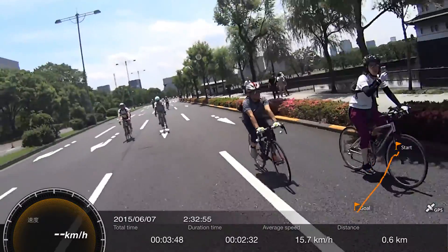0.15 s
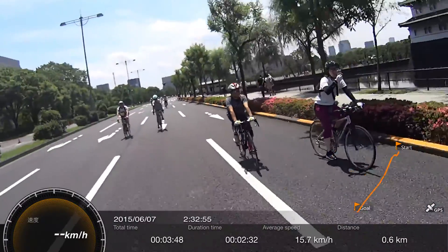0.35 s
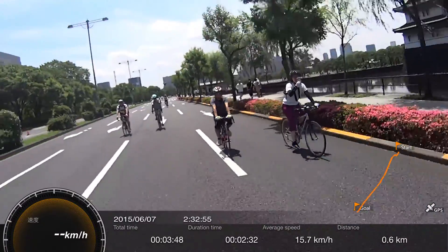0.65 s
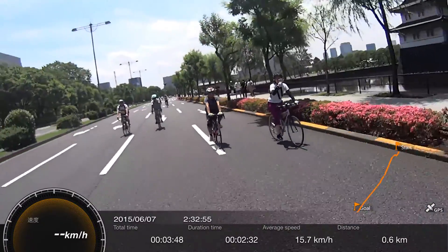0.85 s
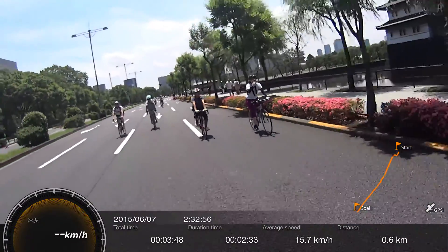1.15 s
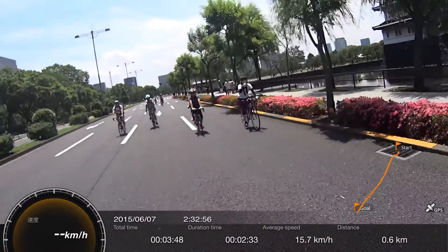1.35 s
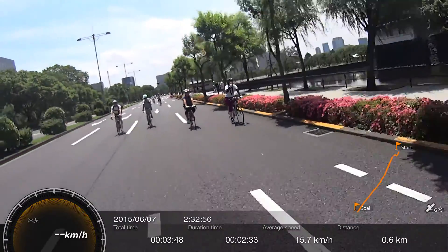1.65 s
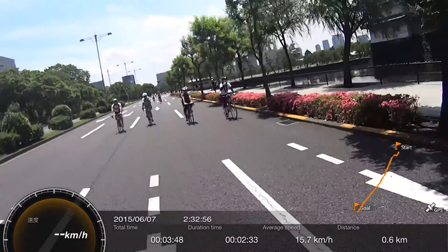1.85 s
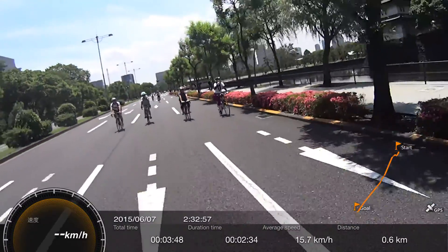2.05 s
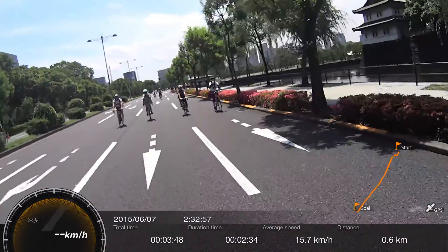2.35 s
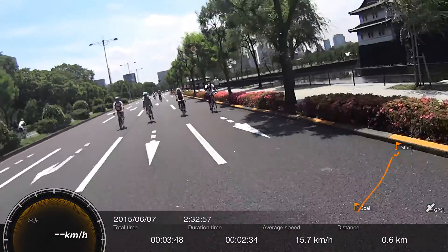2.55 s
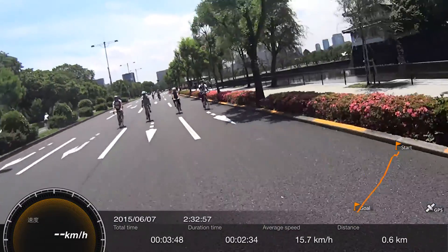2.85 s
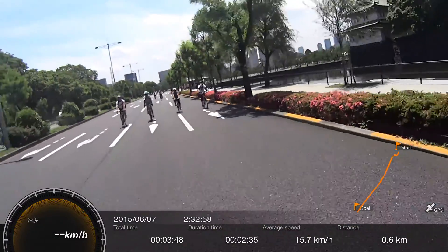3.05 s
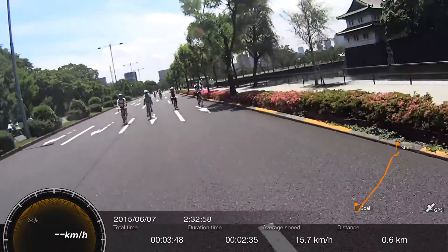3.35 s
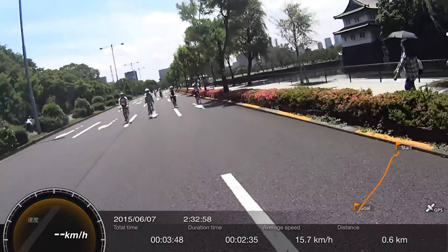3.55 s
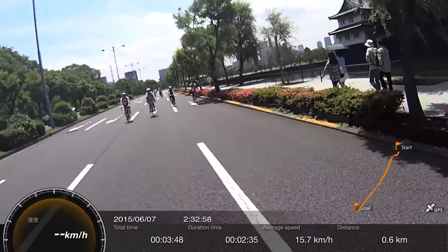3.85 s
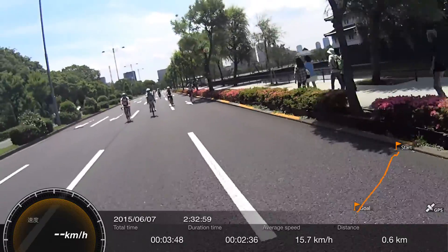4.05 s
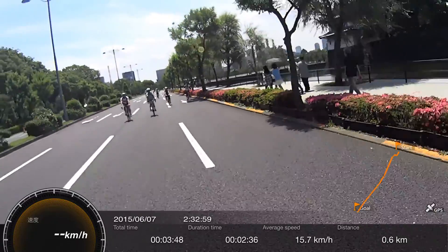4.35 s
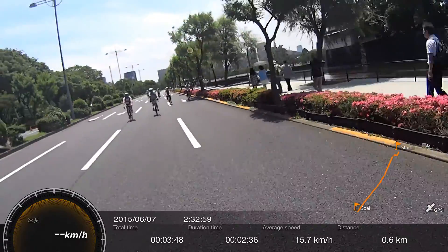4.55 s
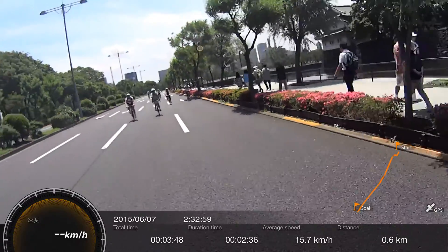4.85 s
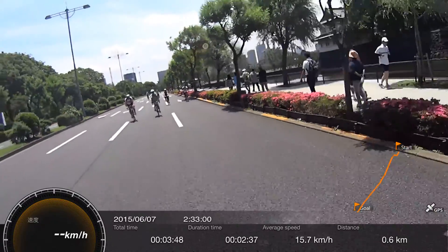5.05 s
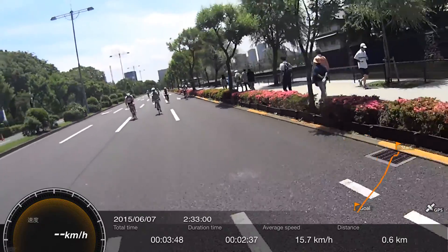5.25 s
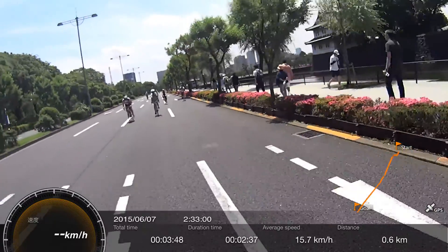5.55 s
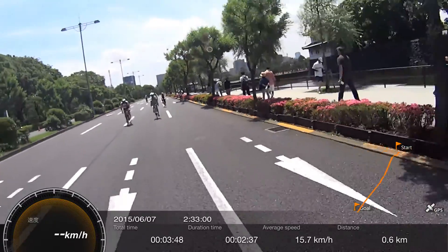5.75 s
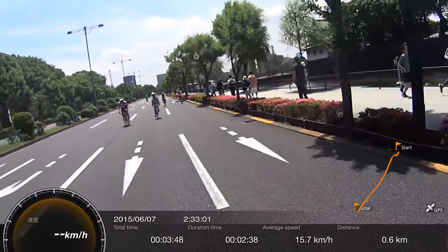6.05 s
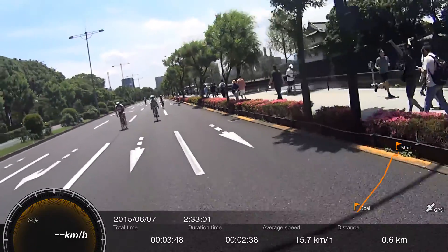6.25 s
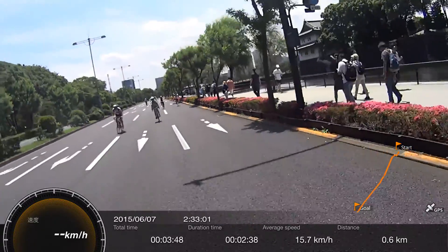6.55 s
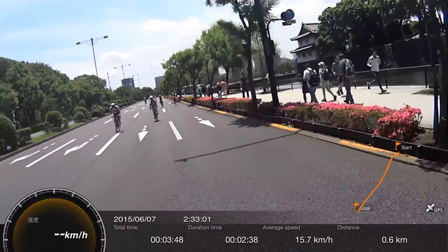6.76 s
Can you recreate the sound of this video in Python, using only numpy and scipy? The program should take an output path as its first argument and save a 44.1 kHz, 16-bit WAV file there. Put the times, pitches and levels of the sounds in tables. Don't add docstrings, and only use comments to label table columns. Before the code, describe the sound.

Outdoors on a paved road, a small camera clamped to a rolling bicycle hears it mainly through the frame. A dull knock and heavy, soft jolt land at once, over steady tyre whirr ringing near 2 kHz, low lumpy wind and faint hiss. Strong short clunks follow around 0.2, 0.8, 1.4, 1.9, 2.5 and 3.1 seconds, among lighter knocks, tiny ticks, chain pings and surging gritty grind. Sharp metal clicks stand out at 2.4, 3.2 and 3.5. A longer jolt with a knock comes at 3.6, then a very brief stuttering scrape at 3.8. From 4 to 5.9 the rattle thins to lighter knocks, ticks and short grinding bursts. Heavy clunks return at 6.0 and 6.6, with a bright click at 6.1. A small spit of grit at 6.8 leads into last knocks and a faint jolt, the whirr continuing to the end near 6.9.

```python
import sys
import numpy as np
from scipy import signal
from scipy.fft import rfft, irfft, next_fast_len
from scipy.io import wavfile

SR = 44100
rng = np.random.default_rng(int(sys.argv[2]) if len(sys.argv) > 2 else 0)


def transcribe(u):
    v = np.clip(np.atleast_2d(u).T, -1, 1)
    q = np.round(v * 32767).astype(np.int16)
    wavfile.write(sys.argv[1], SR, q)


def decibels_to_gain(level_db):
    exponent = np.asarray(level_db, float) / 20
    return 10 ** exponent


N = 305172


def evened(x):
    return x / np.sqrt(np.mean(x ** 2) + 1e-20)


def read(points, hz):
    f, value = np.transpose(points)
    return np.interp(np.log(hz + 1), np.log(f + 1), value)


def gain_over_time(points):
    s, db = np.transpose(points)
    return decibels_to_gain(np.interp(np.arange(N) / SR, s, db))


def add(mix, s, sound):
    part = mix[:, round(s * SR):][:, :sound.shape[-1]]
    part += sound[..., :part.shape[1]]


def coloured(x, points):
    size = next_fast_len(N)
    gain = decibels_to_gain(read(points, np.fft.rfftfreq(size, 1 / SR)))
    return irfft(rfft(x, size) * gain, size)[..., :N]


def pair(same):
    a, b = rng.standard_normal((2, N))
    return np.array([a, same * a + np.sqrt(1 - same ** 2) * b])


def flutter(hz, depth_db):
    step = 32
    low_pass = signal.butter(2, hz, fs=SR / step)
    slow = signal.lfilter(*low_pass, rng.standard_normal(N // step + 2))
    gain = decibels_to_gain(depth_db * np.clip(evened(slow), -3, 1.5))
    return np.interp(np.arange(N) / step, np.arange(len(slow)), gain)


def ring(hz, t60, db, lag=0, rise_cycles=0.38, size=3600):
    t = np.arange(size) / SR
    hz, t60, db, lag = (np.reshape(v, (-1, 1)) for v in (hz, t60, db, lag))
    build_up = 1 - np.exp(-t * hz / rise_cycles)
    return decibels_to_gain(db - 60 * t / t60) * np.sin(2 * np.pi * hz * t - lag) * build_up


# (time [s], level [dB])
WIND_LEVEL = [(0.0, -46), (0.06, -46), (0.44, -47), (1.23, -45), (1.66, -50.5), (2.2, -47.5), (2.35, -46),
              (3.6, -46.5), (3.81, -46), (4.05, -51), (4.28, -52), (4.76, -47.5), (4.93, -48),
              (5.07, -51.5), (6.65, -46), (6.92, -43)]
# (frequency [Hz], level [dB per Hz])
WIND_COLOUR = [(15, -13), (40, -3), (90, -4), (160, -12.5), (300, -9), (800, -107), (3000, -66)]


def wind():
    buffet = evened(coloured(pair(0.95), WIND_COLOUR))
    return decibels_to_gain(5.5) * gain_over_time(WIND_LEVEL) * buffet * flutter(11.8, 2.6)


# (frequency [Hz], level [dB per Hz])
HISS_COLOUR = [(180, -46), (300, -37), (474, 0), (552, 0), (761, -4), (1400, -3.5), (2080, 1),
               (2910, -31.5), (10500, -42), (11500, -50), (15000, -73), (22000, -120)]


def hiss():
    return decibels_to_gain(-43) * evened(coloured(pair(0.46), HISS_COLOUR)) * flutter(48, 0.38)


# (frequency [Hz], level [dB per Hz])
FIZZ_COLOUR = [(3000, -38), (5500, 9), (6500, -4), (11000, -5)]


def fizz():
    rasp = load()[2]
    noise = evened(coloured(pair(0.02), FIZZ_COLOUR) * rasp ** 0.64 * flutter(22, 0.91))
    since = np.arange(N) / SR - 6.787
    grit = (since > 0) * decibels_to_gain(-41 - 10 * abs(since) / 0.035)
    return (decibels_to_gain(-57) + grit) * noise


# (time [s], level [dB])
WHIRR_LEVEL = [(0.0, -39.5), (0.23, -42), (1.44, -39.5), (4.2, -41.5), (4.47, -43), (5.82, -41),
               (6.59, -41), (6.92, -41)]
# (frequency [Hz], width [Hz], level [dB])
HOUSING = [
    (2020, 330, 7),
    (2094, 57, 2.5),
    (2266, 160, 4),
    (2530, 350, -11.5),
]


def tyres():
    noise, whirr = pair(0.5), 0
    for hz, width, db in HOUSING:
        r = np.exp(-np.pi * width / SR)
        resonance = [1, -2 * r * np.cos(2 * np.pi * hz / SR), r * r]
        tone = evened(signal.lfilter([1, 0, -1], resonance, noise))
        whirr = whirr + decibels_to_gain(db) * flutter(8.5, 2.0) * tone
    return decibels_to_gain(1.0) * gain_over_time(WHIRR_LEVEL) * flutter(22, 1.64) * evened(whirr)


# (peak time [s], time to swell by 10 dB [s], grind level [dB],
# low shake level against the grind [dB], rasp level against the grind [dB])
SURGES = [(0.011, 0.038, -36.5, -5, 0.5), (0.137, 0.056, -28, -0.5, -6.5), (0.305, 0.071, -33, -2, -9),
          (0.5, 0.13, -37.5, 0, -2.5), (0.58, 0.078, -33, -1, -7.5), (0.72, 0.058, -27.5, -2, -8),
          (0.9, 0.052, -32.5, 0.5, -13), (1.095, 0.028, -36.5, 7.5, 2), (1.165, 0.049, -30.5, -18.5, -9),
          (1.295, 0.084, -30.5, -3, -5), (1.48, 0.031, -31.5, -16, -24), (1.66, 0.05, -33, 2.5, -2),
          (1.825, 0.057, -32, -4, -8.5), (2.03, 0.044, -32.5, 4.5, -25), (2.235, 0.081, -33, 1, -5.5),
          (2.47, 0.22, -33, -7, -5.5), (2.62, 0.057, -30, -13, -25), (2.803, 0.032, -30.5, 3.5, -5.5),
          (2.981, 0.038, -28, -7, -8), (3.326, 0.12, -30.5, -2.5, -7.5), (3.533, 0.065, -34.5, -1, -6.5),
          (3.97, 0.044, -40, 0, -11), (4.414, 0.021, -32.5, -11, -11), (4.52, 0.082, -40.5, 1.5, -10),
          (4.791, 0.014, -29.5, -3, -21), (5.27, 0.019, -32, -22, -10), (5.49, 0.085, -33, -10, -6.5),
          (5.63, 0.11, -34, -0.5, -8), (5.784, 0.043, -36.5, -9, -5), (5.925, 0.1, -32, -4, -8.5),
          (6.07, 0.1, -34, 4.5, -12), (6.285, 0.17, -36, -7, -5), (6.48, 0.078, -35.5, -4, -6.5),
          (6.685, 0.087, -30, -2, -8), (6.875, 0.068, -33, 6, -2.5)]


def load():
    t = np.arange(0, N / SR + .01, .002)
    power = decibels_to_gain(np.array([[-49], [-61], [-49]])) ** 2
    for s, swell, db, low_db, rasp_db in SURGES:
        drop_db = 10 * np.maximum(s - t, (t - s) / 0.86) / swell
        power = power + decibels_to_gain(db + np.array([[low_db], [0], [rasp_db]]) - drop_db) ** 2
    windup_s, rattle_s = 0.038, 0.093
    for s, db, *_ in CLUNKS:
        drop_db = 10 * np.maximum((s - t) / windup_s, (t - s) / rattle_s)
        shaken_db = np.array([[-27.5], [-26], [-33.5]]) + 0.57 * db
        power = power + decibels_to_gain(shaken_db - drop_db) ** 2
    return [np.interp(np.arange(N) / SR, t, gain) for gain in np.sqrt(power)]


# (frequency [Hz], time to fall 60 dB [s], left level [dB], right level [dB], # lead of
MOUNT_LOW = [(156, 0.049, -17, -17, 0, -1), (243, 0.045, -20, -25, 0.45, -1), (288, 0.032, -13.5, -13, 0.5, -1),
             (347, 0.011, 0, 4, 0.06, 1), (465, 0.031, -15.5, -5, 4, -1), (596, 0.04, -15, -26.5, 0, 1),
             (646.5, 0.045, -16, -15.5, -0.1, -1), (769, 0.061, -22.5, -24, -0.3, 1),
             (911, 0.049, -20.5, -34, -1.5, -1), (998.4, 0.03, -15, -14, 0.25, -1),
             (1140, 0.023, -16.5, -15, -1.53, -1)]
# (frequency [Hz], time to fall 60 dB [s], left level [dB], #
# right level [dB], lead of the left capsule [rad], first motion [+-1])
MOUNT_HIGH = [(1330, .011, -10, -12, .1, -1), (1534, .037, -19, -19, .7, -1), (1677, .029, -25, -26, -.1, 1),
              (2132, .008, -11, -11, -.6, -1), (2174, .015, -15, -18, -.7, 1), (2499, 0.0082, -20, -20, .5, 1),
              (2790, 0.017, -26, -23, .8, -1), (3200, 0.023, -27, -24.5, -0.5, 1),
              (3430, 0.014, -27, -23, -.2, -1), (4010, 0.0072, -22, -24, 0.92, 1),
              (4660, 0.0072, -27, -25, -0.7, -1), (5095, 0.013, -24, -23, 1, 1),
              (5370, 0.0066, -28, -22, 0.8, -1)]
MOUNT = MOUNT_LOW + MOUNT_HIGH


def mount(colour_db, detune=1):
    hz, t60, left_db, right_db, lead, motion = np.transpose(MOUNT)
    left = ring(hz * detune, t60, left_db + colour_db, -lead)
    right = ring(hz * detune, t60, right_db + colour_db)
    return np.sign(motion) @ np.array([left, right])


# (frequency [Hz], level [dB])
GRIND_COLOUR = [(100, -15.5), (280, -6.5), (460, -15), (620, 4), (1000, 8.5), (1600, 13), (2200, 9.5),
                (2800, 3.5), (3400, -0.5), (4000, 0.5), (4600, 1), (5200, -6)]


def drive_train():
    hz, out = np.transpose(MOUNT)[0], 0
    groups, points = np.digitize(hz, [550, 2500]), 5
    group_db, impacts_per_s = (-1.5, -1.2, 1.8), (360, 600, 480)
    for k, (level, db, per_s) in enumerate(zip(load(), group_db, impacts_per_s)):
        impacts = 1. * (rng.random((points, N)) < per_s / SR)
        count = np.count_nonzero(impacts)
        impacts[impacts > 0] = decibels_to_gain(2.63 * np.minimum(rng.exponential(1, count), 4.2))
        impacts *= level * flutter(16.4, 2.8) * rng.choice([-1, 1], (points, N))
        for x, path in zip(impacts, rng.standard_normal((points, 2, len(MOUNT)))):
            feed_db = 2 * path[0] - 60 * (groups != k)
            body = mount(read(GRIND_COLOUR, hz) + feed_db, 1 + .03 * path[1])
            body = body / np.linalg.norm(body)
            grind = signal.oaconvolve(x[None], body, axes=1)[:, :N]
            out = out + decibels_to_gain(db + 7.0) * flutter(9.8, 2.87) * grind
    return out


# (time [s], peak level [dB], pitch [Hz])
PINGS = [(0.0352, -20.5, 1600), (0.1063, -27, 1650), (0.3052, -26, 1450), (0.4713, -32, 2090),
         (0.5796, -20.5, 1580), (1.141, -37, 1650), (1.2474, -21.5, 1590), (1.8063, -28, 2300),
         (1.9288, -17, 1520), (2.2049, -28, 2190), (2.4528, -20.5, 2450), (2.5027, -24, 1600),
         (2.935, -35, 1660), (3.4401, -25, 2000), (3.4725, -30, 2120), (3.5694, -27, 2070),
         (3.6282, -17, 1260), (3.685, -20, 2570), (4.2652, -30, 2150), (4.4103, -27, 1590),
         (4.4174, -35, 2000), (4.8948, -29, 2240), (4.9342, -29, 2060), (5.0764, -24.5, 2170),
         (5.5578, -30, 2320), (6.0791, -28, 1640), (6.7436, -36, 1490)]


def pings():
    out = np.zeros((2, N))
    for s, db, f in PINGS:
        add(out, s, ring([f, f], [0.023] * 2, [db - 4.0, db + 3.5], [0, .4], 0.73, size=1200))
    return out


# (middle time [s], peak level [dB], pitch [Hz],
# left minus right level [dB], half length [ms])
SLIPS = [(3.8305, -22, 2300, 0, .6), (3.8322, -13, 1900, -5, .5), (3.8343, -12, 2550, -6, .9),
         (3.8358, -14, 2720, 12, .9), (3.8367, -6, 2450, -10, .6), (3.8381, -12, 2000, 6, .5),
         (3.8397, -16, 2250, -5, .6), (3.8421, -13, 1950, 5, .9), (3.8449, -8, 2200, 5, .7),
         (3.8466, -20, 2100, 0, .6), (3.849, -17, 2050, 3, .6), (3.833, -22, 900, 4, .8),
         (3.8372, -17, 1450, -4, .6), (3.842, -21, 1200, 0, .7), (3.8448, -25, 3400, 6, .4)]


def scrape():
    out, t = np.zeros((2, N)), np.arange(400) / SR
    for s, db, f, pan_db, half_ms in SLIPS:
        u = t - t[200]
        slip = np.cos(2 * np.pi * f * u - np.array([[2.2], [0]])) / np.cosh(u * 1300 / half_ms)
        add(out, s - t[200], decibels_to_gain([[db + pan_db / 2], [db - pan_db / 2]]) * slip)
        add(out, s - t[100], decibels_to_gain(db - 28.0) * rng.standard_normal((2, 200)) * np.hanning(200))
    return out


# (time [s], peak level [dB], low ring under it [dB], upper ring under it [dB])
TICKS = [(0.1376, -22, -9, -24), (0.194, -27, 1, -20), (0.6797, -32, -1, -7), (0.717, -21, -5.5, -28),
         (1.19, -38, 18, -18), (1.447, -29, 1, -12), (1.978, -23, -7, -18), (2.231, -20.5, -8, -26),
         (2.7936, -23, -4, -24), (2.816, -25, -10, -23), (3.0404, -25, -12, -16), (3.333, -24.5, 1.5, -24),
         (3.526, -40, -7, -15), (4.166, -42.5, 12, -16), (4.248, -30, -5, -16), (4.4792, -44, -18, -14),
         (4.598, -31, -6, -17), (4.782, -40, 14, -20), (4.8404, -29, -11, -17), (4.9696, -37.5, 11, -11),
         (5.3457, -34, -13, -18), (5.633, -40, -5, -19), (5.911, -26, -8, -22), (6.0603, -27.5, -14, -7.5),
         (6.679, -22.5, -3, -15), (0.1096, -27, -2, -25), (0.4958, -25, -6, -24), (0.5377, -39, -10, -20),
         (0.7038, -24, -6, -23), (0.7871, -27, -2, -20), (1.1004, -25, -8, -23), (2.506, -20, -3, -20),
         (2.7821, -26, -3, -20), (3.6188, -24, -5, -22), (6.858, -28, -5, -18)]
# (time [s], peak level [dB], low ring under it [dB],
# upper ring under it [dB], extra treble [dB])
CLICKS = [(0.5112, -23, -16, -16, 3), (1.0874, -22, -8, -25, 0), (1.6277, -37, 0, -6, -5),
          (1.6685, -15, -26, -22, 3), (2.4277, -9.5, -12.5, -27, 5), (3.0595, -22, -8, -23, 2),
          (3.1951, -9, -13, -15, -8), (3.543, -7, -17, -17, 0.5), (5.4755, -28, -19, -10, 0),
          (5.529, -45, 5, 1, 13), (6.1051, -5, -20, -18.5, -2.5), (6.4026, -22.5, -25, -25, 0),
          (6.537, -17.5, -18, -16, -3), (6.7878, -17, -24, -17, 8.5)]
# (frequency [Hz], time to fall 60 dB [s], level [dB])
TICK_MODES = [(1515, 0.022, -1.5), (2120, 0.019, 3), (2856, 0.013, -7), (3260, 0.012, -2.5),
              (3800, 0.0056, -12.5), (4450, 0.013, 3.5), (4820, 0.014, 3), (5220, 0.0075, 4.5),
              (6630, 0.009, 6), (8500, 0.0066, -5), (10000, 0.0064, -0.5)]
TICK_RING = [1, 1, 0, 0, 0, 2, 2, 2, 3, 3, 3]


def ticks():
    out, (hz, t60, mode_db) = np.zeros((2, N)), np.transpose(TICK_MODES)
    t, contact_s = np.arange(1200) / SR, 0.00129
    press = np.exp(-(np.minimum(t - contact_s, 0) / (.5 * contact_s)) ** 2)
    hold = decibels_to_gain(60 * np.minimum(t, contact_s) / t60[:, None])
    for s, db, low, upper, *bright in sorted(CLICKS + TICKS):
        start, tune, side = rng.standard_normal((3, len(hz)))
        treble = upper - 9.5 + sum(bright)
        level_db = db - 6.0 + mode_db + np.array([0, low, upper, treble])[TICK_RING]
        for capsule, spread in enumerate((0, .35)):
            lag = 0.35 * np.tanh(start) + spread * side
            modes = ring(hz * (1 + 0.021 * tune), t60, level_db + 4.7 * capsule, lag, size=1200)
            add(out[capsule:capsule + 1], s - .0005, (press * hold * modes).sum(0))
    return out


# (time [s], peak level [dB], frequency [Hz], time to fall 60 dB [s])
JOLTS = [
    (0.0354, 0, 107.4, 0.037),
    (3.632, -16.5, 214, 0.13),
    (6.145, -27, 108, 0.076),
    (6.865, -28, 110, 0.038),
]


def jolts():
    out = np.zeros((2, N))
    for s, db, f, t60 in JOLTS:
        add(out, s, ring([f, f], [t60, t60], [db, db], [.8, -.8]))
    return out


# (time [s], blow level [dB], thump under the blow [dB],
# ring under the blow [dB], hardness under the blow [dB])
CLUNKS = [(0.209, -5.5, -6.5, -12.5, -15), (0.418, -26, 1, 3.5, -5), (0.8, -3.5, -18, -16, -20.5),
          (0.992, -12.5, -11, -14, -19), (1.365, -5, -12, -13, -16), (1.562, -25.5, -1, 0.5, -13),
          (1.9378, -9.5, -9, -7.5, -13), (2.5146, -6, -14, -10.5, -14), (2.8491, -10, -16, -15.5, -24),
          (3.0817, -4.5, -14.5, -16, -15.5), (3.631, -10.5, -9.5, -5, -15),
          (5.9779, -6.5, -14, -11.5, -15.5), (6.185, -21.5, 1.5, 1, -4), (6.5694, -6.5, -14.5, -9.5, -20.5),
          (6.769, -15, -4, -2.5, -6)]
# (time [s], blow level [dB], thump under the blow [dB],
# ring under the blow [dB], hardness under the blow [dB])
KNOCKS = [(0.034, -13, -11.5, -19.5, -31), (1.149, -17.5, -6.5, -7.5, -26), (1.628, -29, -6, -7, -16),
          (1.7089, -13, -19, -23, -26), (2.1135, -18, -19, -19, -18), (2.274, -18, -14, -16, -30),
          (2.496, -32, 2, -2, -13), (2.506, -25, -14, 2, -16), (3.053, -30.5, -10, -1, 0),
          (3.278, -29, -5, 0, -18), (3.362, -24, -33, -9, -15), (3.704, -27.5, -5, -13, -12),
          (4.124, -17, -23.5, -18, -25), (4.279, -14, -17.5, -17, -21), (4.851, -18, -11.5, -18, -17),
          (5.125, -19.5, -25, -30, -28), (5.237, -36.5, -2, -11, -16), (5.377, -34, 4, -3.5, -2),
          (5.475, -31.5, -19, -8, 4), (5.599, -26.5, 0.5, 1, -22), (5.621, -28, -18, -3, -0.5),
          (5.634, -26, -10, -2, -17), (6.861, -29.5, -13, -18, -5), (0.28, -32, -2, -22, -20),
          (0.871, -31, -6, -18, -20), (1.073, -28, -4, -16, -15), (2.421, -26, -13, -18, -12),
          (2.574, -23.5, -3.5, -21, -36), (2.686, -29, -10, -7, -25), (2.763, -25, -13, -22, -15),
          (3.037, -32, -12, -10, -7), (3.143, -29, -5, -6, -24), (3.528, -28, -11, -6, -20),
          (5.416, -29, -22, -12, -5), (5.44, -28.5, -16, -13, -24), (5.58, -38, -10, -10, -20),
          (5.754, -32, -21, -23, -15), (6.268, -33, -15, -6, -20), (6.47, -30, -24, -7, -24),
          (6.823, -24, -5, -26, -24)]
# (frequency [Hz], level under the blow [dB])
USUAL_KNOCK = [(170, -15.5), (420, 1.5), (750, -11), (1500, -12), (2800, -23), (4000, -29), (5100, -11)]


def knocks():
    out, hz = np.zeros((2, N)), np.transpose(MOUNT)[0]
    for s, db, thump, body, hard in sorted(CLUNKS + KNOCKS):
        level, tune = rng.standard_normal((2, len(MOUNT)))
        crack = hard - 13
        wanted = (thump, 0, body, hard, crack, crack, crack)
        colour_db = read([(f, v - usual) for (f, usual), v in zip(USUAL_KNOCK, wanted)], hz)
        chatter = rng.standard_normal(2000) * (rng.random(2000) < .03)
        blow = decibels_to_gain(-15.0 - 60 * np.arange(2000) / SR / 0.083) * chatter
        early, late = round(.0016 * SR), round((.0112 + .0006 * tune[0]) * SR)
        blow[[0, early, late]] = 1, 0.13, 0.079
        struck = mount(colour_db + 1.2 * level, 1 + .007 * tune)
        sound = signal.fftconvolve(struck, blow[None], axes=1)
        add(out, s + .0006, decibels_to_gain(db + 8) * sound)
    return out


def rubber_seat(swing):
    travel = 1.2
    return travel * np.tanh(swing / travel)


def scene():
    background = wind() + hiss() + fizz() + tyres()
    small_parts = pings() + scrape() + ticks()
    return background + drive_train() + small_parts + rubber_seat(jolts() + knocks())


def top_cut(x):
    return signal.sosfilt(signal.butter(12, 11970, fs=SR, output="sos"), x)


def record(dry):
    mid, side = (dry[0] + dry[1]) / 2, (dry[0] - dry[1]) / 2
    side = coloured(side, [(30, -6), (70, -7), (150, 1.5), (300, 0.0), (600, 2.7),
                           (2500, -3.0), (5000, -2.5), (9000, 0.5)])
    edge = signal.firwin(801, 11150, window=("kaiser", 8), fs=SR)
    mix = signal.oaconvolve(np.array([mid + side, mid - side]), edge[None], "same")
    return top_cut(mix)


dry = scene()
out = record(dry)
transcribe(out)
```